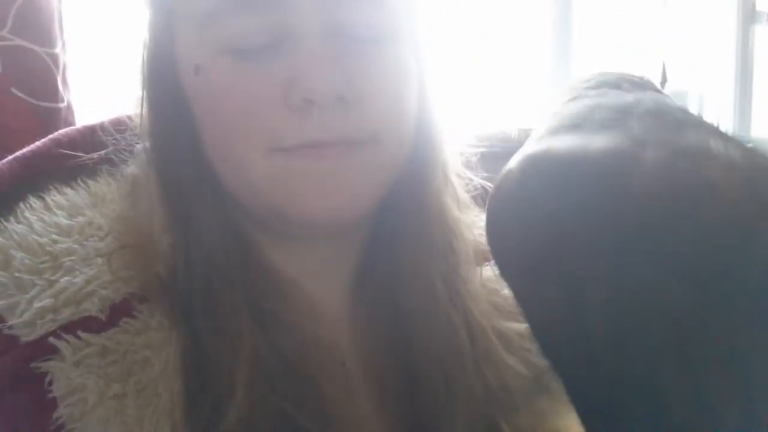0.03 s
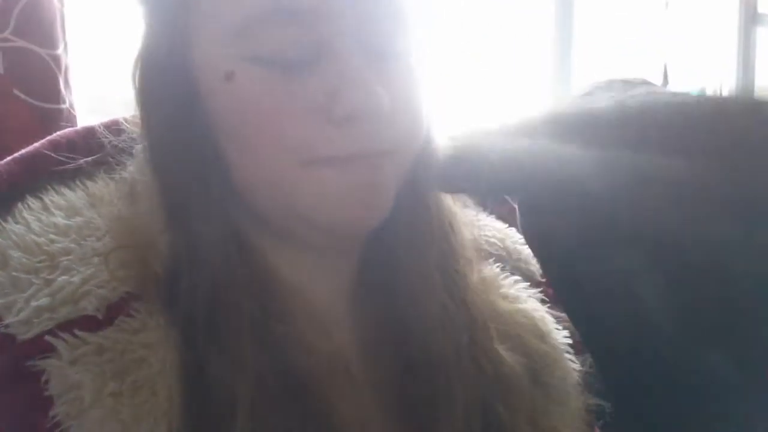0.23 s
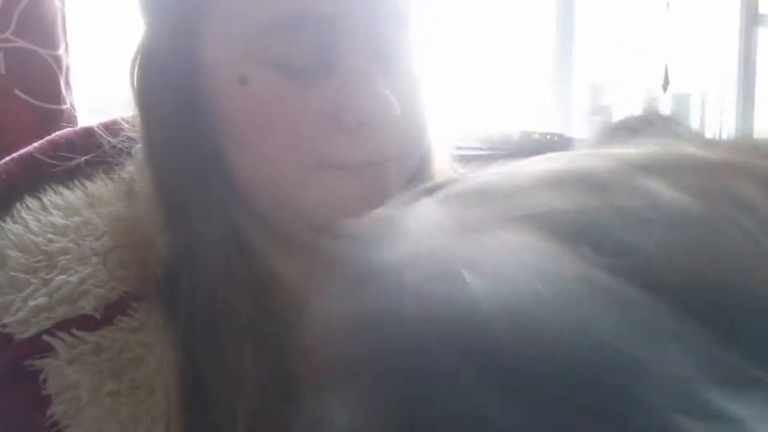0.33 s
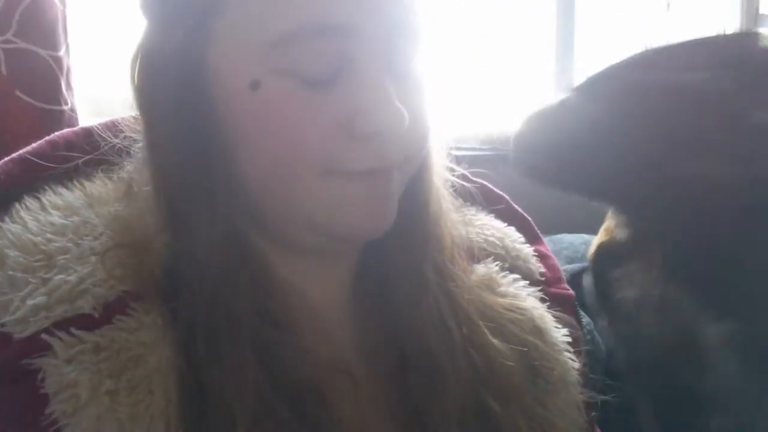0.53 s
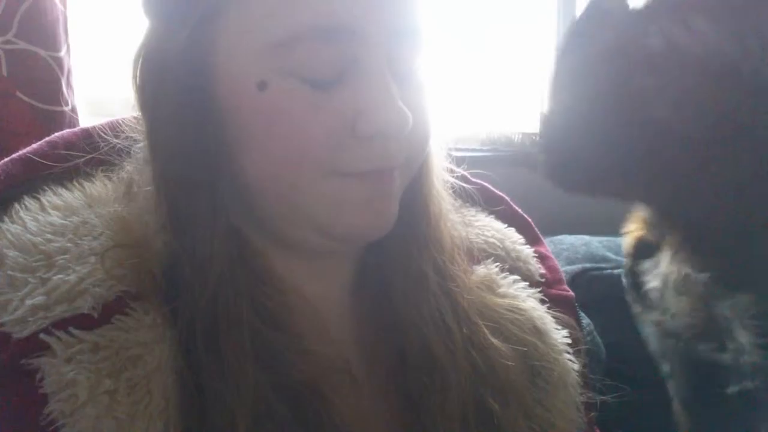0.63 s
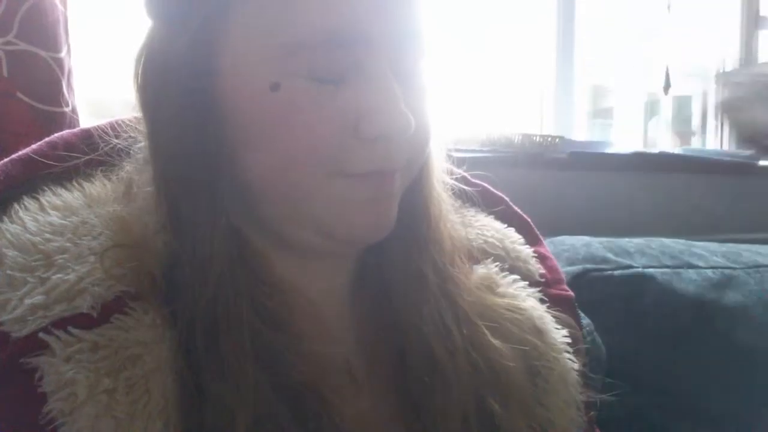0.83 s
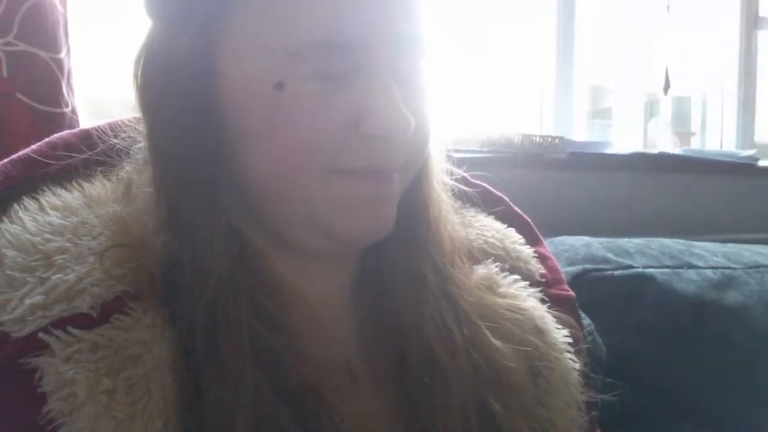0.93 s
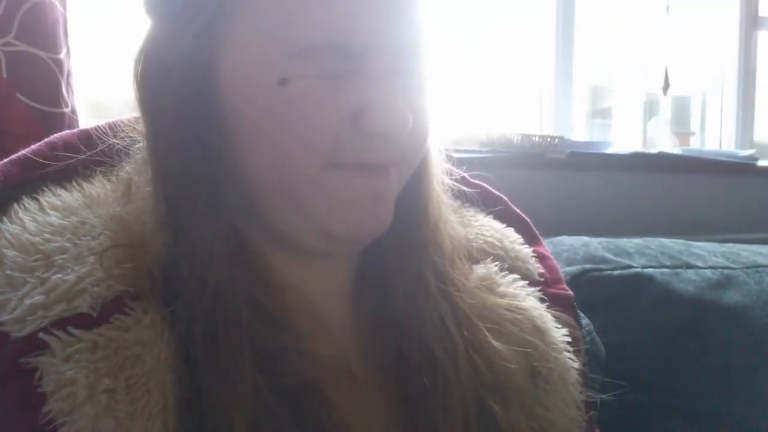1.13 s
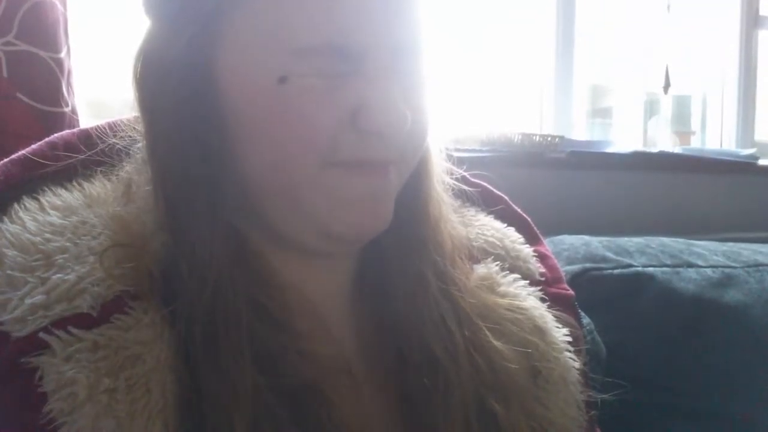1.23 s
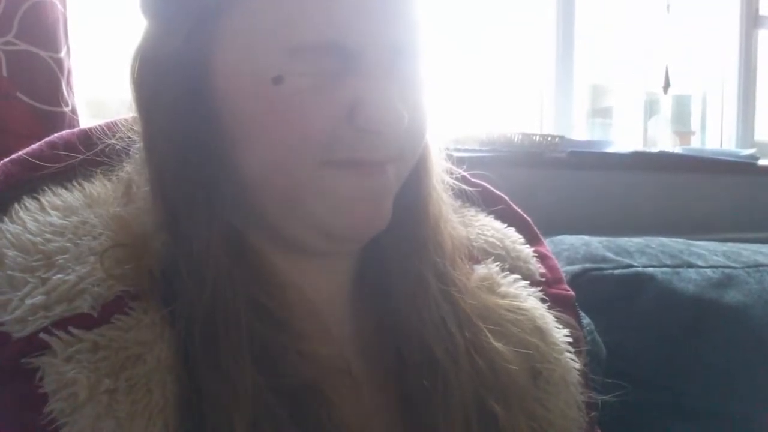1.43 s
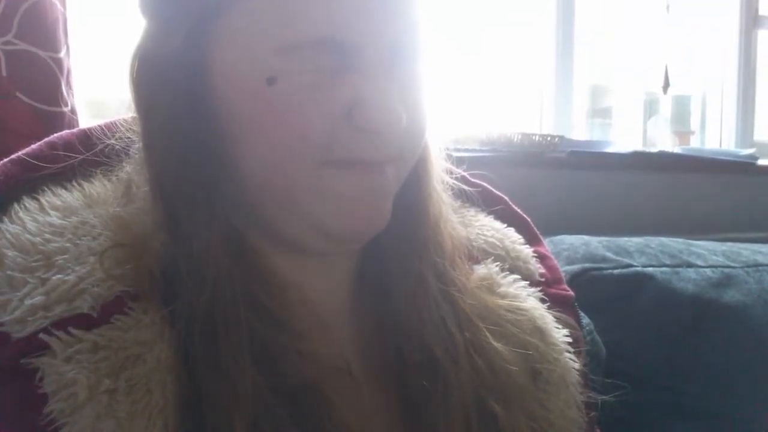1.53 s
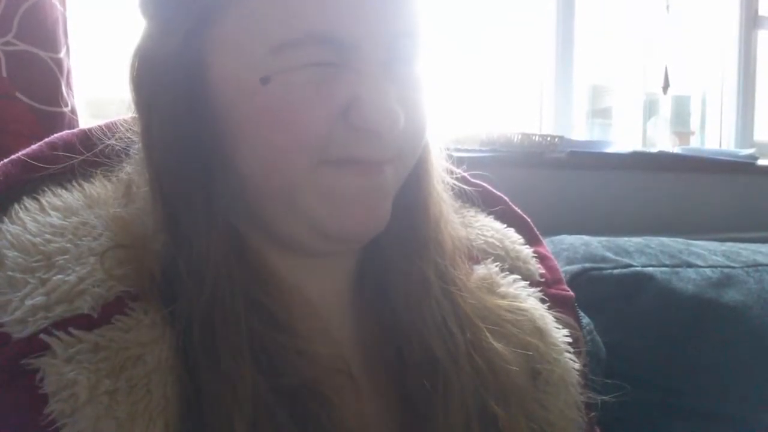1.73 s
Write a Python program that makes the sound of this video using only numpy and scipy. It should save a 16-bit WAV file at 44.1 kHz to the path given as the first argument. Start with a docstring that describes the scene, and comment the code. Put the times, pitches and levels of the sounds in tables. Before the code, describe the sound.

Small metal bells jingle brightly and irregularly as a dog shifts on a living room sofa. Something brushes the close microphone once on the right, soft thuds follow, and the jingling dies down over faint cloth rustle.

```python
"""A living room: two small pellet bells jingle close to the microphone as a dog moves on a sofa and leaves.
Each pellet blow restarts the rings and adds a short clack of the shells; the fittings tick dryly.
Fur and cloth rustle over room air and a faint hum.
Something brushes the right microphone port once, and soft thuds reach it later."""
import sys
import numpy as np
from scipy import signal
from scipy.fft import rfft, irfft
from scipy.io import wavfile
from scipy.ndimage import uniform_filter1d

SR = 44100
rng = np.random.default_rng(int(sys.argv[2]) if len(sys.argv) > 2 else 0)


def store_pcm(level_fs):
    """Save levels as 16-bit WAV."""
    pcm = np.round(np.clip(level_fs, -1, 1) * 32767).astype(np.int16)
    wavfile.write(sys.argv[1], SR, np.atleast_2d(pcm).T)


N = 79380

# Pellet blows. Each row: start in seconds, ring level in dB, higher bell's share (0-1) of the lowest mode,
# offsets in dB for second partial, third partial, clack and tick, t60 in seconds, lowest mode L-R in dB.
BLOWS = [(0.1701, -22.5, 0.54, -45, -35, -9.5, -37, 0.07, 3.5), (0.216, -32, 1, -17, -5, 3.5, -8, 0.16, 1),
         (0.2238, -25.5, 0.062, -24, 0, -25, -9, 0.17, 2),
         (0.2364, -25, 0.11, -16.5, 7, -1, -35, 0.88, 0.5), (0.271, -23.5, 0.044, -14, 4, -3, 1.5, 0.16, 7),
         (0.2823, -16.5, 0.21, -23, 0, -6.5, -22, 0.17, -3),
         (0.296, -16.5, 0.98, -4, -6.5, -1.5, -5.5, 0.14, -4),
         (0.306, -9, 0.32, -16, -5.5, -6, -26, 0.23, 4.5),
         (0.3136, -18.5, 0.95, -4.5, 5.5, -16, -18, 0.56, 1.5),
         (0.338, -21.5, 0.47, -5, 3.5, 3, -2, 0.38, 3), (0.371, -16, 0.99, -25, -8, -36, -4.5, 0.11, 30),
         (0.3898, -6, 1, -23.5, -13.5, -14, -8.5, 0.18, 3.5), (0.438, -17, 1, -6, -4, -15, -6.5, 0.081, 32),
         (0.471, -27.5, 0.19, -23, 2, -12, -10, 0.082, -6), (0.5078, -37, 0.38, -17, -4, 4, -9, 0.13, 6),
         (0.517, -27, 0.19, -25, -0.5, -5, -22, 0.046, -30),
         (0.546, -35, 0.47, -14.5, 12.5, 9, 2, 0.14, -5),
         (0.6384, -32.5, 0.35, -25, 4.5, 5.5, 0, 0.11, -18),
         (0.6903, -23.5, 0.3, -10, -4.5, 3, 2.5, 0.097, -2),
         (0.7052, -12.5, 0.57, -9.5, -0.5, -6.5, -9, 0.087, 10),
         (0.7371, -22, 0.52, -37, -11.5, 4, -1.5, 0.3, -3.5),
         (0.802, -18.5, 0.34, -12.5, -4, -3.5, -1.5, 0.21, -2),
         (0.825, -13, 0.32, -21.5, -5.5, -34, -12, 0.1, -6),
         (0.8455, -5, 0.69, -22.5, -4.5, -24, -23, 0.065, -0.5),
         (0.868, -21, 0.29, -10, -12.5, -10.5, -41, 0.33, -24),
         (0.8986, -19.5, 0.8, -26.5, 5, 1.5, -28, 0.11, 18),
         (0.905, -25.5, 0.3, -13, 12, -6, -28, 0.059, 21), (0.925, -18.5, 0.25, -26, 14, 4, 2, 0.12, 6.5),
         (0.947, -34, 0.81, -5.5, 2.5, -12, -18, 0.34, 7), (1.003, -42, 0.62, -8.5, 5.5, 5, 10, 0.53, 6),
         (1.1, -32.5, 0.036, -25, 1, -7.5, -11.5, 0.22, 3.5),
         (1.117, -20, 0.055, -21, -7, -5.5, -25.5, 0.8, 6.5),
         (1.139, -19.5, 0.53, -12, 3.5, -5.5, -10.5, 0.21, 2),
         (1.147, -16.5, 0.07, -27, -4.5, 3, -18, 0.025, 12),
         (1.17, -16, 0.094, -16, 4.5, -4, -6.5, 0.1, -0.5),
         (1.206, -28.5, 0.059, -23.5, -1, 5.5, -23, 0.16, -4),
         (1.22, -32, 0.13, -7.5, 7, -12, -16, 0.14, 3.5), (1.249, -30, 0.87, -9, -13, 5, -3.5, 0.083, -1),
         (1.313, -36.5, 0.099, -14, -6.5, 2.5, -1, 0.14, 4),
         (1.445, -39.5, 0.26, -12, 2, -1.5, 2, 0.059, 16),
         (1.518, -17.5, 0.025, -23, -3.5, -5.5, -19, 0.079, 3.5),
         (1.5495, -27.5, 0.12, -27, -18, 1.5, -18, 0.082, 0),
         (1.618, -34.5, 0.37, -25.5, -21, 3, -15, 0.041, 2.5)]


def undb(db):
    """Decibels to gain."""
    return 10 ** (np.asarray(db) / 20)


def clock():
    """Sample times in seconds."""
    return np.arange(N) / SR


def pan(side_db):
    """Stereo gains of unit mean power for an L-R difference."""
    gains = undb(np.array([[side_db], [-side_db]]) / 2)
    return gains / np.sqrt(np.mean(gains ** 2))


def left_gain(db):
    """Stereo gains: left at db, right at unity."""
    return np.array([[undb(db)], [1]])


def noise(colour):
    """Uncorrelated stereo noise, rms 1, shaped by (Hz, dB) points."""
    hz, db = np.array(colour, float).T
    bins_hz = np.maximum(np.fft.rfftfreq(N, 1 / SR), 1)
    shape = undb(np.interp(np.log(bins_hz), np.log(hz), db))
    x = irfft(rfft(rng.standard_normal((2, N))) * shape, N)
    return x / x.std()


def burst(start_s, decay_s):
    """Instant rise, exponential fall."""
    age = clock() - start_s
    return (age >= 0) * np.exp(-np.clip(age / decay_s, 0, 60))


def swell(centre_s, sigma_s):
    """Gaussian envelope."""
    return np.exp(-.5 * ((clock() - centre_s) / sigma_s) ** 2)


def wander(per_s):
    """Smooth random motion per channel, spread near 1."""
    hold = int(SR / per_s)
    steps = rng.standard_normal((2, N // 50))[:, np.arange(N) // hold]
    return 1.145 * uniform_filter1d(steps, size=hold, axis=1)


def pushes(rows):
    """Contacts, each a brief pressure oscillation."""
    t = clock()
    return sum(undb(db) * swell(s, sigma_s) * np.sin(2 * np.pi * hz * (t - s))
               for s, db, hz, sigma_s in rows)


def background():
    """Room air and a faint hum."""
    air_hz_db = [(15, -33.5), (25, -4.5), (145, -12), (335, -19.5), (1890, -33.5), (3920, -35.5),
                 (10400, -37.5), (12900, -31.5), (16000, -51.5)]
    hum_hz = 115.8
    air = undb(-61.5) * noise(air_hz_db) * pan(5)
    hum = undb(-65.5) * np.sqrt(2) * np.sin(2 * np.pi * hum_hz * clock())
    return air + hum


def rustle():
    """Fur and cloth slide: noise with a grainy level."""
    # Each row: time in seconds, level in dB.
    contour = [(0, -68.5), (.19, -60), (.29, -52.5), (.5, -52), (.6, -53.5), (0.789, -49.5), (.9, -53),
               (1.019, -56), (1.15, -56.5), (1.28, -58.5), (1.36, -58.5), (1.551, -55.5), (1.7, -63.5),
               (1.8, -74.5)]
    # Each row: frequency in Hz, level in dB.
    colour = [(30, -1), (200, -0.5), (400, -6), (900, -8), (1800, -10), (5000, -11), (9000, -15),
              (15000, -26)]
    t = clock()
    times_s, db = np.array(contour).T
    grain_db = 2.92 * np.interp(t, np.linspace(0, N / SR, N // 200), rng.standard_normal(N // 200))
    return undb(np.interp(t, times_s, db) + grain_db) * noise(colour) * left_gain(1.5)


def clacks():
    """The pellet strikes damped shell modes, differently at each spot, then rolls on lightly."""
    # Rebounds that leave the ring running. Each row: start in seconds, level in dB.
    rebounds = [(.037, -45), (.0935, -40.5), (.178, -30), (.186, -33), (.1965, -40), (.9075, -27),
                (.9135, -34), (.919, -18), (.9315, -21), (1.013, -39), (1.031, -43), (1.1535, -22),
                (1.178, -22.5), (1.186, -20), (1.387, -36), (1.419, -37.5), (1.555, -30.5), (1.563, -38.5),
                (1.576, -31.5), (1.599, -37), (1.651, -40)]
    # Each row: frequency in Hz, level in dB, t60 in seconds, L-R in dB.
    modes = [(2370, -5, 0.018, 9.5), (2502, -1, 0.029, 27), (2634, -1, 0.02, 10.5),
             (2790, -3.5, 0.022, -3.5), (3003, 4, 0.015, 8), (6088, -16.5, 0.057, -7.5),
             (9200, -6.5, 0.011, -17), (10500, -12, 0.035, -12), (11900, -34.5, .025, -13)]
    trim_db, scatter_hz, attack_s = -4, 42, 0.0012
    roll_per_s, roll_db, roll_decay_s = 150, -11, 0.021
    out, age = np.zeros((2, N)), clock()[:SR // 6]
    hits = [(start_s, db + clack_db) for start_s, db, _, _, _, clack_db, *_ in BLOWS] + list(rebounds)
    for (start_s, db), spot in zip(hits, rng.standard_normal((len(hits), len(modes), 3))):
        shell = np.zeros((2, len(age)))
        for (hz, mode_db, t60_s, side_db), (detune, phase, right_rad) in zip(modes, spot):
            angle = 2 * np.pi * (hz + scatter_hz * detune) * age + np.pi * phase
            wave = np.sin(angle + np.array([[0], [right_rad]]))
            shell += undb(mode_db - 60 * age / t60_s) * pan(side_db) * wave
        shell *= 1 - np.exp(-age / attack_s)
        impacts = (rng.random(len(age)) < roll_per_s / SR) * undb(roll_db) * np.exp(-age / roll_decay_s)
        impacts[0] = 1  # the hit itself
        clack = signal.fftconvolve(shell, impacts[None], axes=1)[:, :len(age)]
        i = int(start_s * SR)
        out[:, i:i + len(age)] += undb(trim_db + db) * clack[:, :N - i]
    return out


def room(x):
    """Short reflections of a furnished room."""
    # Each row: frequency in Hz, level in dB.
    colour = [(200, -8.5), (2600, -3.5), (3200, -0.5), (6500, 3), (10000, -0.5), (16000, -13)]
    delay_s, t60_s, wet_db = 0.0015, 0.2, -7.5
    tail = noise(colour) * burst(delay_s, t60_s / np.log(1000))
    tail /= np.sqrt(np.sum(tail ** 2, axis=1, keepdims=True))
    return undb(wet_db) * signal.fftconvolve(x, tail, axes=1)[:, :N]


def scuffs():
    """Cloth scuffs: brief swells of dull noise."""
    # Each row: centre in seconds, level in dB, spectral peak in Hz, sigma in seconds.
    rubs = [(0.16, -51, 1352, 0.0085), (0.52, -47.5, 380, 0.0085), (0.788, -45, 600, 0.0054),
            (0.931, -43, 292, .015)]
    cloth = sum(undb(db) * swell(s, sigma_s) * noise([(hz / 4, -16), (hz, 0), (hz * 2.2, -20)])
                for s, db, hz, sigma_s in rubs)
    return cloth * left_gain(-4)


def jingle():
    """Each blow arrests the ring and starts a new one, slightly detuned; the two bells beat and sway."""
    # One row per bell: lowest partial, second, third, its close twin and top partial, in Hz.
    modes_hz = [(3107, 6520, 10055, 9962, 15460), (3206.4, 6480, 10195, 10030, 15420)]
    # One row per bell: weights of the same modes in dB.
    modes_db = [(0, -0.63, -5, -12.5, -33), (0, -0.62, -13.5, -12, -36.5)]
    t60_ratios = [1, 1.0, 0.98, 0.95, 0.53]
    trim_db, attack_s, arrest_s, detune, kick_rad = -1, 0.0012, 0.0012, 0.0025, 0.83
    port_rad = np.array([[0], [0.82]])  # the ring reaches the right port first
    # The swinging bells turn: each mode's level and phase wander at each port.
    sway_per_s, sway_db, sway_rad = 45, [0.78, 1.7, 2.7, 3.2, 3.0], [0.71, 0.99, 0.79, 0.88, 1.1]
    t, out = clock(), np.zeros((2, N))
    draws = rng.standard_normal((len(BLOWS), *np.shape(modes_hz), 2))
    phase = rng.uniform(0, 2 * np.pi, np.shape(modes_hz))
    sway = [[(undb(db * wander(sway_per_s)), rad * wander(sway_per_s))
             for db, rad in zip(sway_db, sway_rad)] for _ in modes_hz]
    ends_s = [blow[0] for blow in BLOWS[1:]] + [N / SR]
    for blow, end_s, draw in zip(BLOWS, ends_s, draws):
        start_s, db, share, second_db, third_db, _, _, t60_s, side_db = blow
        span = slice(int(start_s * SR) + 1, int((end_s + 10 * arrest_s) * SR))
        age = t[span] - start_s
        gate = (1 - np.exp(-age / attack_s)) * np.exp(-np.maximum(t[span] - end_s, 0) / arrest_s)
        share = np.clip(share, .02, .98)
        second = undb(second_db) * left_gain(-12.5)
        third = undb(third_db) * left_gain(-18)
        for bell, weight in enumerate(np.sqrt([1 - share, share])):
            gains = [weight * pan(side_db), second, third, third, left_gain(-20.5)]
            for mode, t60_ratio in enumerate(t60_ratios):
                sway_gain, drift_rad = sway[bell][mode]
                rad_per_s = 2 * np.pi * modes_hz[bell][mode] * (1 + detune * draw[bell, mode, 0])
                phase[bell, mode] += kick_rad * draw[bell, mode, 1]
                wave = np.sin(rad_per_s * age + phase[bell, mode] + drift_rad[:, span] + port_rad)
                envelope = gate * sway_gain[:, span] * undb(-60 * age / (t60_s * t60_ratio))
                level = np.sqrt(2) * undb(trim_db + db + modes_db[bell][mode]) * gains[mode]
                out[:, span] += level * envelope * wave
                phase[bell, mode] += rad_per_s * (end_s - start_s)
    return out


def ticks(ring):
    """Contact noise of blows, fittings and light pellet bounces that follow the ring's level."""
    # Each row: start in seconds, level in dB.
    fitting_hits = [(0.3142, -20.5), (0.626, -35), (1.131, -27), (1.135, -33), (1.1475, -45),
                    (1.154, -21.5), (1.337, -32.5), (1.357, -34.5), (1.4499, -33), (1.4552, -41),
                    (1.4713, -27.5), (1.534, -28)]
    # Each row: frequency in Hz, level in dB.
    colour = [(300, -24.5), (1500, -23), (2500, 1.5), (4400, -2), (6700, 0.5), (8200, 0), (10000, -2.5),
              (11400, -3), (12200, -5), (13200, -7), (16000, -12)]
    blow_trim_db, pellet_decay_s = -1.5, 0.0017
    bounces_per_s, spread_db, rattle_db = 320, 4, -31
    blows = sum(undb(blow_trim_db + db + tick_db) * burst(start_s, pellet_decay_s)
                for start_s, db, _, _, _, _, tick_db, _, _ in BLOWS)
    fittings = sum(undb(db) * burst(start_s, decay_s=0.0016) for start_s, db in fitting_hits)
    bounces = (rng.random(N) < bounces_per_s / SR) * undb(spread_db * rng.standard_normal(N))
    bounce_decays = signal.lfilter([1], [1, -np.exp(-1 / (pellet_decay_s * SR))], bounces)
    ring_rms = np.sqrt(np.abs(uniform_filter1d(np.mean(ring ** 2, axis=0), size=400)))
    rattle = undb(rattle_db) * ring_rms * bounce_decays
    return np.sqrt(blows ** 2 + fittings ** 2 + rattle ** 2) * noise(colour) * left_gain(-12.5)


def brush():
    """Something bumps and scrapes across the right port."""
    # Each row: centre in seconds, level in dB, frequency in Hz, sigma in seconds.
    bumps = [(.3976, -10.5, 259.8, 0.0009), (.4012, -5.5, 5050, 0.00023), (.4195, -6, 1240, 0.00031),
             (.4246, -9.5, 237, 0.0012), (.453, -25, 126, 0.0018)]
    # Each row: start in seconds, level in dB, decay in seconds.
    scrapes = [(0.397, -24.5, 0.0024), (0.4015, -10.5, 0.00043), (0.4049, -17.5, 0.0049),
               (0.411, -25.5, 0.016), (0.415, -19, 0.0017), (0.4188, -10, 0.0028), (0.4253, -19, 0.0015)]
    # Each row: frequency in Hz, level in dB.
    colour = [(60, -32), (200, -6), (600, -2), (1400, -9.5), (2500, -4), (5500, -11.5), (8000, -12.5),
              (15000, -25.5)]
    envelope = sum(undb(db) * burst(start_s, decay_s) for start_s, db, decay_s in scrapes)
    return (pushes(bumps) + envelope * noise(colour)) * left_gain(-34)


def thuds():
    """Soft, low contacts reach the right port."""
    # Each row: centre in seconds, level in dB, frequency in Hz, sigma in seconds.
    contacts = [(.912, -37.5, 70.9, 0.01), (.958, -35, 131, 0.0081), (.971, -20, 132, 0.0027),
                (.985, -24.5, 74.6, 0.0052), (.991, -27, 167.3, 0.0015), (1.035, -28.5, 131, 0.0028),
                (1.055, -38.5, 65.6, 0.036), (1.073, -31, 161, 0.00505), (1.081, -31.5, 269, 0.0022),
                (1.111, -29, 91, 0.0036), (1.142, -36.5, 70.5, 0.0085)]
    return pushes(contacts) * left_gain(-31)


def scene():
    """Bells and fittings in the room, contacts at the port, cloth and room air."""
    ring = jingle()
    knocks = clacks() + ticks(ring)
    reflections = room(undb(-3) * ring + knocks)
    return ring + knocks + reflections + brush() + thuds() + rustle() + scuffs() + background()


def record(dry):
    """Soft peak limiting, then a steep low-pass."""
    ceiling, cutoff_hz = 0.78, 16300
    limited = dry / (1 + (dry / ceiling) ** 6) ** (1 / 6)
    return signal.sosfilt(signal.ellip(10, .2, 70, cutoff_hz, fs=SR, output="sos"), limited)


dry = scene()
out = record(dry)
store_pcm(out)
```